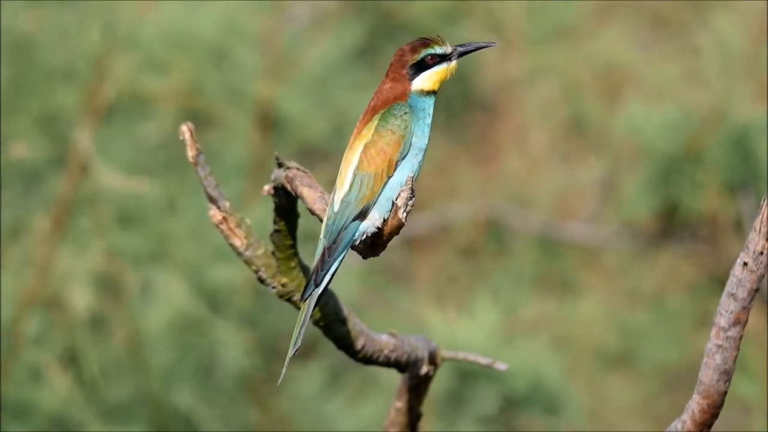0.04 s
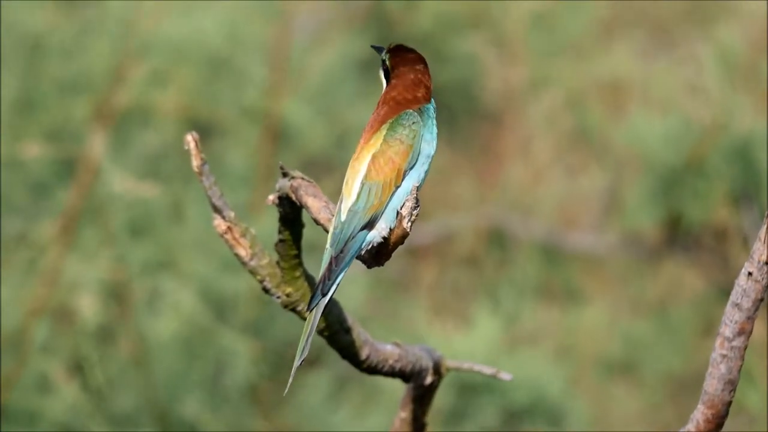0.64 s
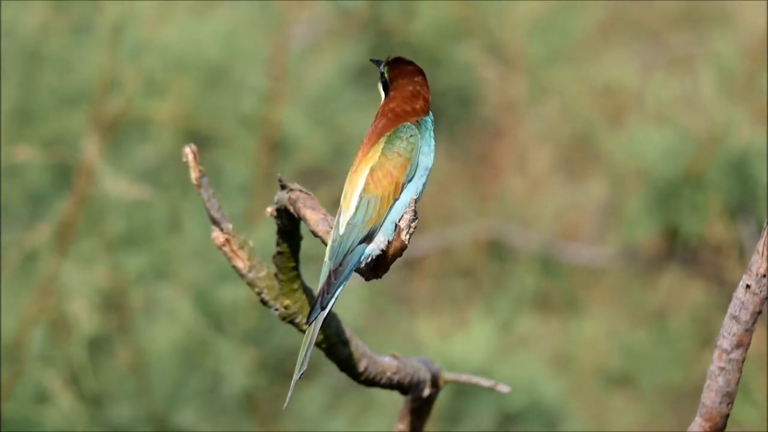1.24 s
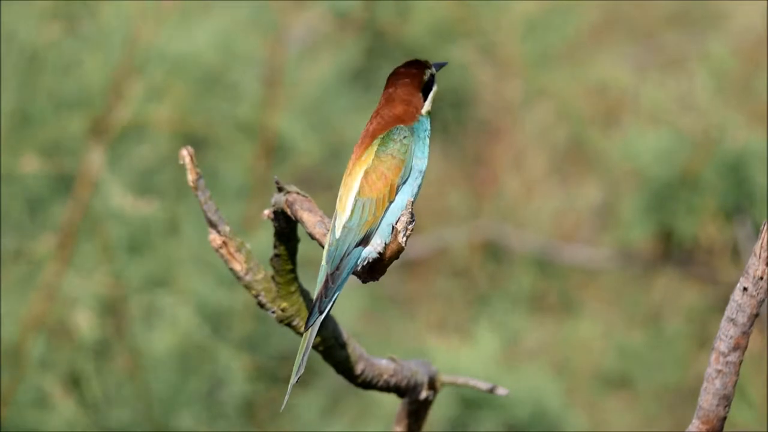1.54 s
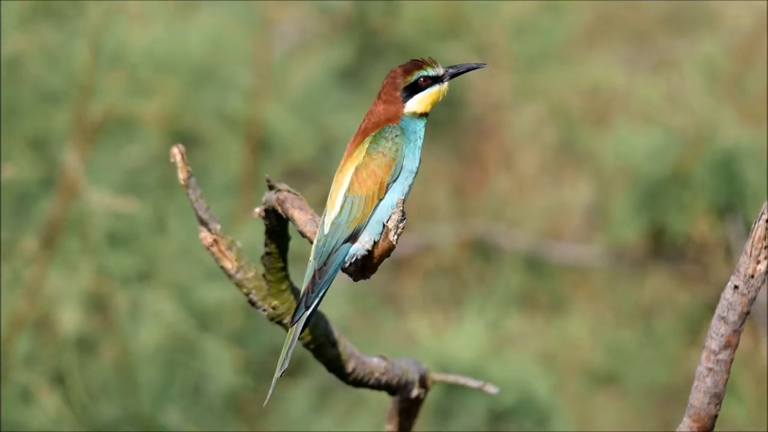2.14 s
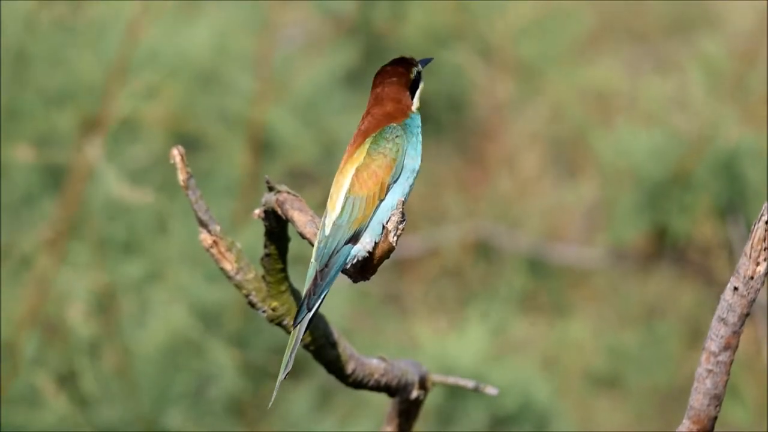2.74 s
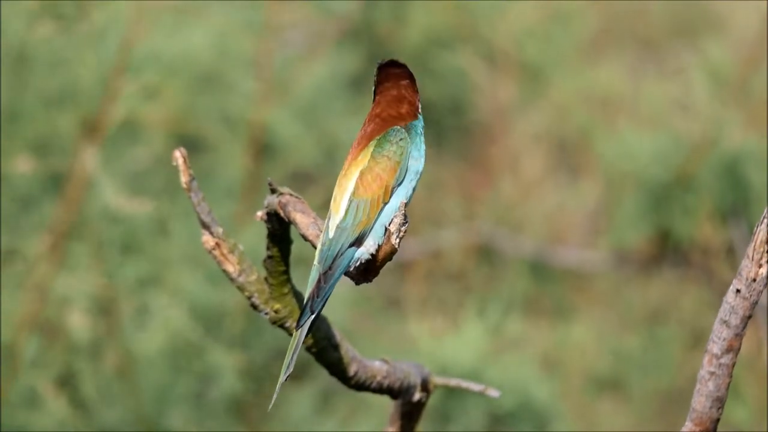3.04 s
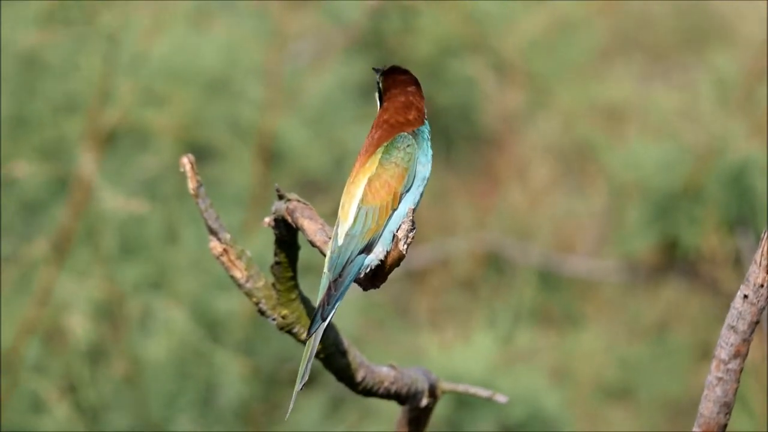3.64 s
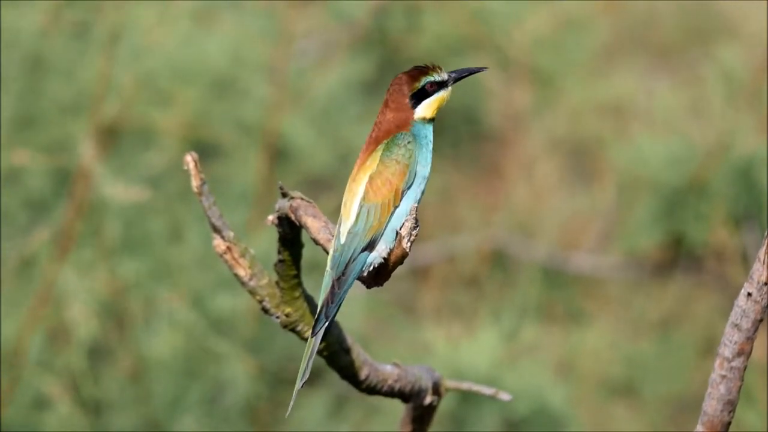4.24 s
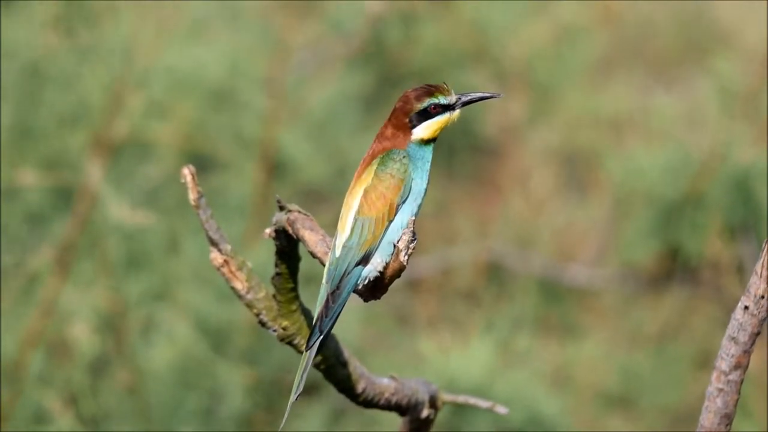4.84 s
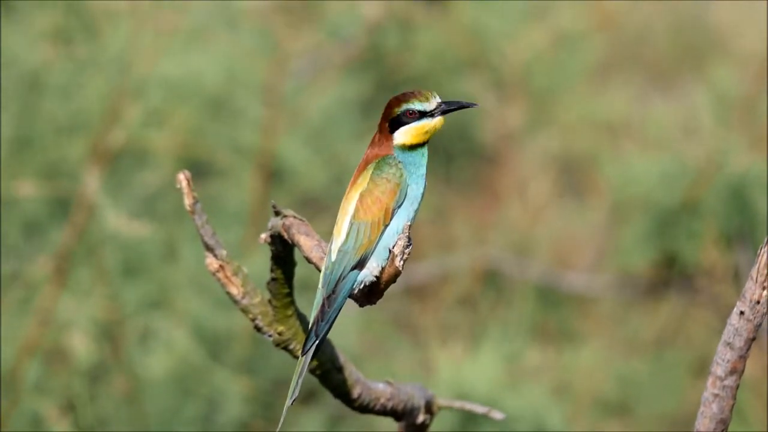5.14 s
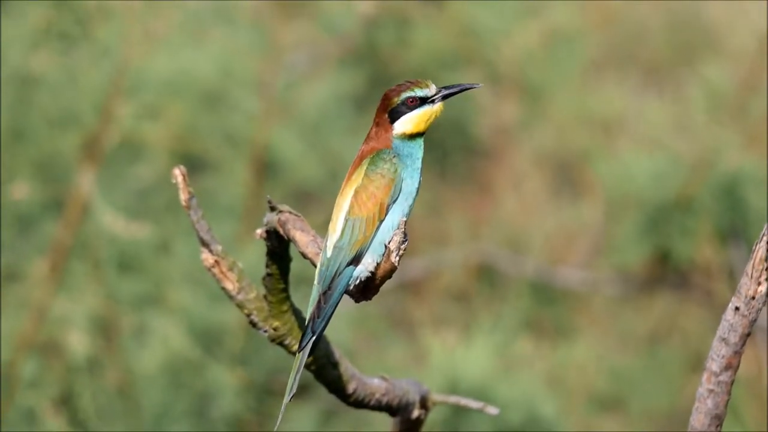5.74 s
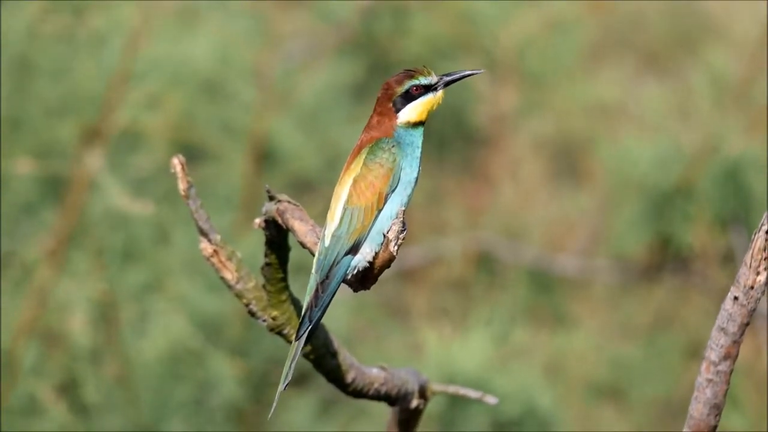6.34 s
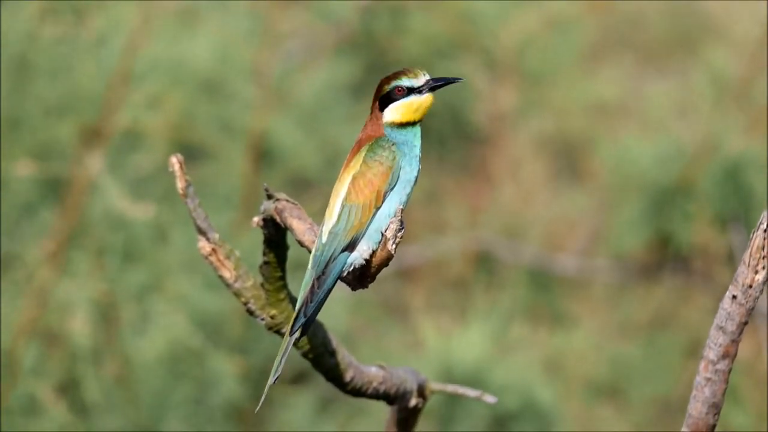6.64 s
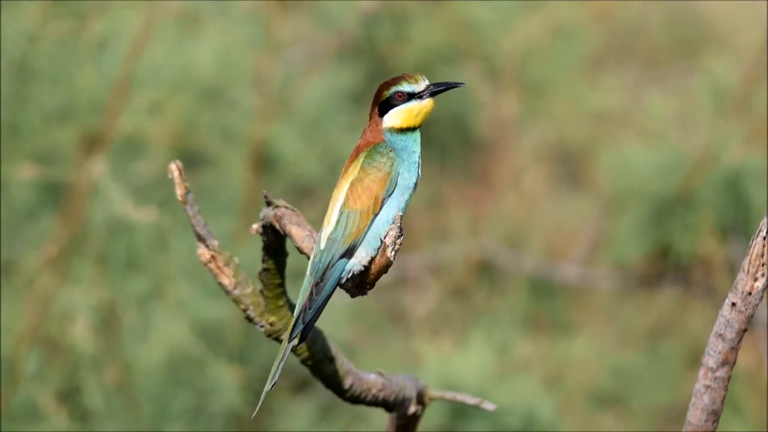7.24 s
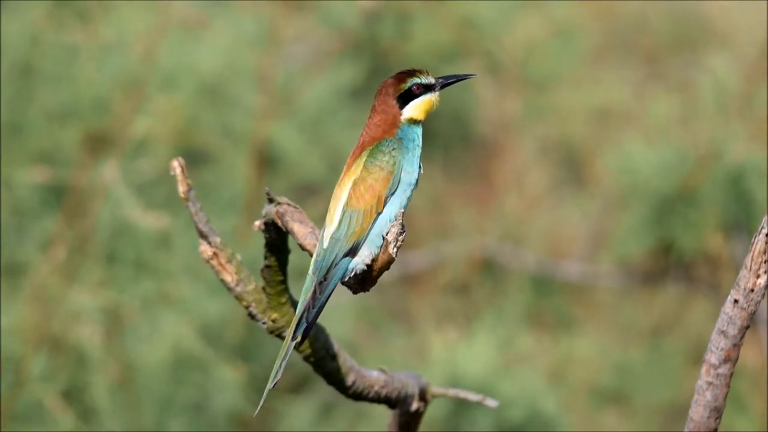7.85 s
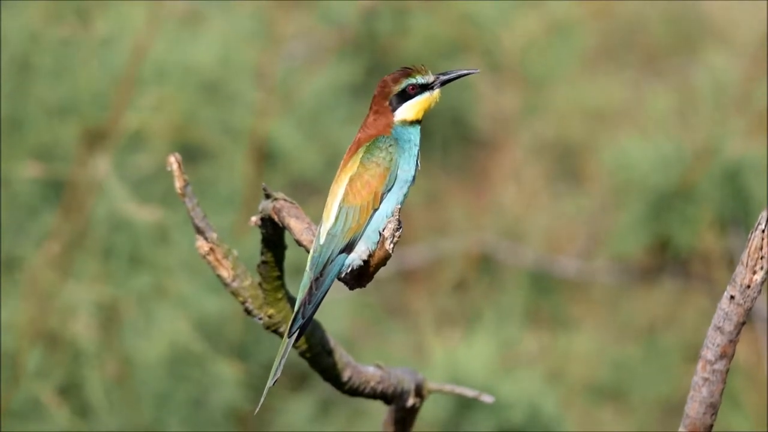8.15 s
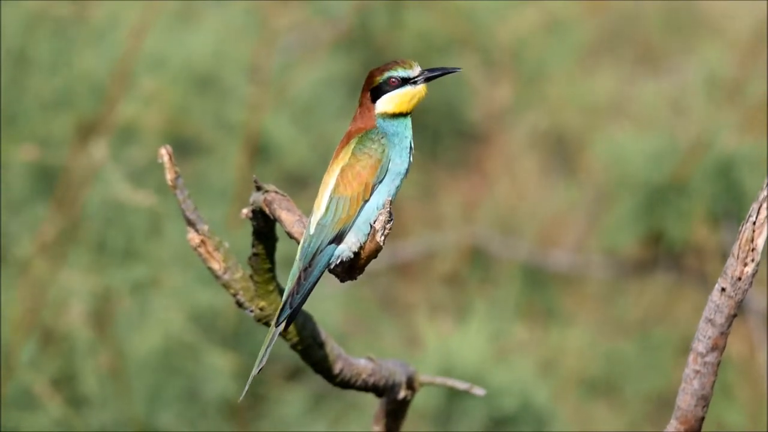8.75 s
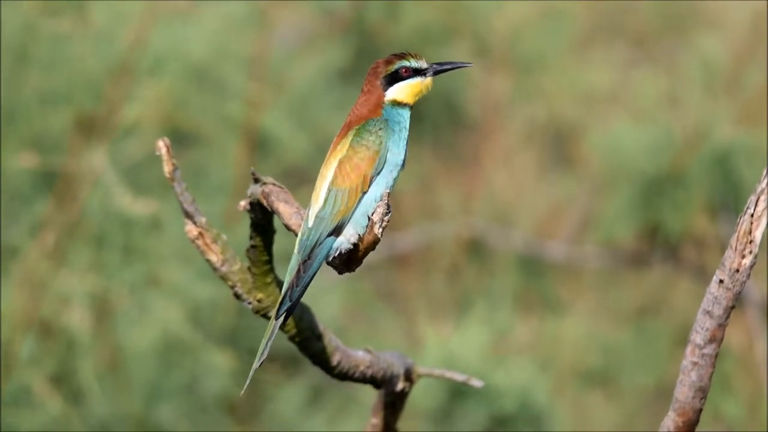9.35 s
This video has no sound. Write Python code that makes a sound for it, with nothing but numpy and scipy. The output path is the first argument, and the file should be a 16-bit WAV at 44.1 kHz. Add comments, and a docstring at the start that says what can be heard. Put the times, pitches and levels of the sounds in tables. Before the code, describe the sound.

A nearby bird repeats short, liquid whistles over gusts of wind rumbling on the microphone, with faint chirps from distant birds.

```python
"""Short, liquid, arched whistles: a bee-eater calls again and again in open country.
Each whistle is a nearly pure tone from its syrinx that climbs to a crest and drops.
Gusts rumble and thump as their eddies hit the two microphone ports. Small birds chirp far off,
blurred by the bushes, over a distant drone and a soft hiss of foliage."""
import sys
import numpy as np
from scipy import signal
from scipy.fft import rfft, irfft
from scipy.io import wavfile

SR = 44100
rng = np.random.default_rng(int(sys.argv[2]) if len(sys.argv) > 2 else 0)


def bounce(signal):
    """Save signal as a 16-bit WAV file at the path given by the first command-line argument."""
    frames = np.transpose(np.atleast_2d(signal))
    limited = np.clip(frames, -1, 1)
    pcm = np.round(limited * 32767).astype(np.int16)
    wavfile.write(sys.argv[1], SR, pcm)


N = 423360
TIME = np.arange(N) / SR


def from_db(db):
    return 10 ** (np.asarray(db) / 20)


def in_time(rows):
    """Each column of an automation curve at every sample."""
    times, *columns = np.transpose(rows)
    return [np.interp(TIME, times, column) for column in columns]


def noise(spectrum):
    """Noise of the given colour, rms 1."""
    hz, level_db = np.transpose(spectrum)
    bins_hz = np.maximum(np.fft.rfftfreq(N, 1 / SR), 1)
    eq = from_db(np.interp(np.log(bins_hz), np.log(hz), level_db))
    coloured = irfft(rfft(rng.standard_normal(N)) * eq, N)
    return coloured / np.sqrt(np.mean(coloured ** 2))


def drift(rate, t=TIME):
    """Random wander through `rate` new values a second."""
    return np.interp((t - t[0]) * rate, np.arange(4096), rng.standard_normal(4096))


def panned(pan_db):
    """Left and right gains of constant total power; pan_db is left minus right."""
    gains = from_db([[pan_db / 2], [-pan_db / 2]])
    return gains / np.sqrt(np.mean(gains ** 2))


def add(out, start_s, sound):
    """Mix a sound in from the given time on."""
    i = max(round(start_s * SR), 0)
    out[..., i:i + sound.shape[-1]] += sound[..., :max(N - i, 0)]


# Colours of the four ambience beds: (frequency [Hz], relative level [dB])
DRONE_COLOUR = [(100, -7.5), (200, 1), (260, -2), (400, -4.5), (520, -2.5), (640, -6), (730, -2),
                (800, 2.5), (870, -8.5), (960, -2), (1100, -17.5), (1600, -51.5)]
RUSH_COLOUR = [(700, -38), (1050, -0.5), (1230, 1.5), (1370, 0), (1530, 2), (1750, -5.5), (2200, -9.5),
               (3000, -13), (5000, -63)]
FOLIAGE_COLOUR = [(1700, -43), (2400, -2.5), (2900, 5), (3250, 1.5), (3650, 8), (3950, 4.5), (4350, 3.5),
                  (5000, -2.5), (5700, -4.5), (6600, -17), (7600, -14), (10000, -24), (15000, -60)]
AIR_COLOUR = [(30, -13), (150, -23), (400, 0), (1500, 1.5), (3000, -3.5), (5000, -8), (7500, -12.5),
              (10000, -16.5), (13000, -19), (16000, -28)]
# Fader rides on the far beds: (time [s], drone [dB], rush [dB], foliage [dB])
BED_FADERS = [(0, -55.5, -56, -62.5), (.64, -54, -53, -61.5), (2.4, -54.5, -50.7, -60.5),
              (3.87, -54, -52, -62), (5.3, -54.5, -51.5, -62.5), (6.7, -53.5, -53, -66.5),
              (7.62, -53, -51.5, -63.7), (8.2, -52.5, -50.5, -63.5), (9.6, -52.8, -50, -65)]


def countryside(drone_trim_db=4.5, rush_trim_db=1.0, air_db=-60, flicker_db=1.46):
    """Far drone, rush and foliage reach both ports alike; a faint, even hiss adds width."""
    drone_db, rush_db, foliage_db = in_time(BED_FADERS)
    drone = from_db(drone_db + drone_trim_db) * noise(DRONE_COLOUR)
    rush = from_db(rush_db + rush_trim_db + flicker_db * drift(12)) * noise(RUSH_COLOUR)
    foliage = from_db(foliage_db + flicker_db * drift(20)) * noise(FOLIAGE_COLOUR)
    air = from_db(air_db) * np.array([noise(AIR_COLOUR), noise(AIR_COLOUR)])
    return drone + rush + foliage + air


# Fader ride on the hum: (time [s], level [dB])
HUM_FADER = [(6.6, -69), (7.8, -53), (9.6, -53)]
# Colour of the hum: (frequency [Hz], relative level [dB])
HUM_COLOUR = [(550, -25), (760, 5.5), (980, 2.5), (1120, -22), (1300, -41)]


def far_hum():
    """A narrow, centred hum, perhaps of far traffic, swells towards the end."""
    return from_db(in_time(HUM_FADER)[0]) * noise(HUM_COLOUR)


# Colour of dry leaves: (frequency [Hz], relative level [dB])
LEAF_COLOUR = [(3000, -18), (6500, 3), (9500, 0), (11500, -14), (16000, -32)]


def rustle(peak_s=8.08, width_s=.2, level_db=-75.5):
    """Dry leaves stir in one brief, bright swell."""
    swell = np.exp(-((TIME - peak_s) / width_s) ** 2)
    return swell * from_db(level_db + 2 * drift(80)) * noise(LEAF_COLOUR)


def twitter(trim_db=-4.5, pip_hz=3680, count=520):
    """A far chorus of pips thins out over time; its level rides the foliage fader."""
    out = np.zeros(N)
    foliage_db = in_time(BED_FADERS)[2]
    for k, (chance, length, pitch, glide, size) in enumerate(rng.random((count, 5))):
        start = int((1 - np.sqrt(chance)) * (N - 1))
        t = TIME[:int((.012 + .03 * length) * SR)]
        progress = t / t[-1]
        spread = .5 if k % 3 else .04   # every third pip stays close to one note
        hz = pip_hz * np.exp(spread * (pitch - .5 + .5 * (glide - .5) * progress))
        swell = from_db(foliage_db[start] + trim_db + 3 * size) * np.sin(np.pi * progress)
        add(out, start / SR, swell * np.sin(2 * np.pi * np.cumsum(hz) / SR))
    return out


# Far chirps: (time [s], length [s], start pitch [Hz], middle pitch [Hz], end pitch [Hz], level [dB])
CHIRP_CUES = [(0.298, .06, 6200, 6450, 7000, -70), (2.11, .06, 5000, 4930, 4700, -69),
              (3.017, 0.091, 4400, 4080, 3830, -61), (3.347, 0.094, 4300, 4040, 4170, -61.5),
              (3.733, .04, 3900, 4400, 4514, -62), (4.662, 0.056, 5100, 4860, 4940, -62),
              (5.932, 0.051, 3500, 4400, 4990, -61), (5.946, 0.027, 3000, 3300, 3915, -58),
              (6.11, .032, 3400, 4050, 4290, -55.5), (6.189, 0.029, 4000, 4250, 4250, -68),
              (6.55, 0.042, 3400, 4000, 4700, -58), (6.731, 0.037, 3400, 4050, 4300, -55.5),
              (6.929, 0.054, 4500, 4400, 4220, -66.5), (7.146, 0.044, 4300, 4350, 4470, -63.5),
              (7.221, 0.022, 3400, 3770, 4470, -55), (7.385, 0.055, 4500, 4230, 3780, -63.5),
              (7.713, 0.064, 3600, 3830, 4080, -64), (8.155, 0.043, 4650, 5140, 5220, -58.5),
              (8.191, 0.041, 4900, 5600, 4700, -67), (8.222, 0.071, 4400, 3780, 3403, -64),
              (8.446, 0.061, 5000, 4950, 4852, -61), (8.502, 0.029, 3500, 3930, 4090, -58),
              (8.759, 0.059, 4400, 3650, 3500, -64), (9.105, 0.038, 4700, 5470, 5350, -65),
              (9.13, 0.039, 4700, 5380, 4630, -59), (9.182, 0.083, 4400, 3870, 3493, -63),
              (9.353, 0.058, 6000, 6460, 6000, -63), (9.358, 0.025, 3500, 4280, 4300, -57.5),
              (9.417, 0.029, 3200, 3700, 4434, -60)]


def small_birds(trim_db=2.5, rasp=0.75, waver=.055):
    """Thin glides through three pitches: quick ones fairly clean, drawn-out ones scratchy."""
    out = np.zeros(N)
    for s, length_s, start_hz, middle_hz, end_hz, chirp_db in CHIRP_CUES:
        t = TIME[:int(length_s * SR)]
        progress = t / length_s
        scratch = np.interp(length_s, [.03, .06], [.35, 1])
        glide = np.polyfit([0, .5, 1], [start_hz, middle_hz, end_hz], 2)
        hz = np.polyval(glide, progress) * (1 + waver * scratch * drift(500, t))
        swell = np.sqrt(np.sin(np.pi * progress)) * (1 + scratch * rasp * drift(350, t))
        add(out, s, from_db(chirp_db + trim_db) * swell * np.sin(2 * np.pi * np.cumsum(hz) / SR))
    return out


# Faint ticks: (time [s], level before the filter [dB], low edge [Hz], high edge [Hz], decay [s])
TICK_CUES = [(1.4235, -43, 2500, 13000, .0004), (4.469, -42, 2200, 4000, .006)]


def ticks():
    """Tiny dry snaps: band-passed noise bursts that die at once."""
    out, t = np.zeros(N), TIME[:SR // 40]
    for s, tick_db, low_hz, high_hz, decay_s in TICK_CUES:
        burst = from_db(tick_db) * rng.standard_normal(len(t)) * np.exp(-t / decay_s)
        band = signal.butter(2, [low_hz, high_hz], "band", fs=SR, output="sos")
        add(out, s, signal.sosfilt(band, burst))
    return out


# Light breeze between the gusts: (time [s], level [dB])
BREEZE_FADER = [(0, -54), (1.15, -55), (1.5, -47), (1.95, -53), (2.85, -47), (3.4, -48), (3.6, -54),
                (4.8, -59), (5.45, -53), (5.85, -59), (6.0, -53), (6.45, -70), (7.55, -64), (8.0, -49),
                (9.2, -53), (9.6, -47.5)]
# Gusts over the ports: (time [s], hold [s], level [dB], left minus right [dB])
GUST_CUES = [(.045, 0.022, -33, 3), (0.087, .05, -44, 0), (0.312, 0.048, -47, -3), (0.774, .06, -46, -6),
             (1.269, 0.044, -35, -3), (1.349, 0.053, -42, -5), (1.425, 0.034, -28, -2),
             (1.48, .11, -33, -4), (1.646, 0.045, -35, -2), (1.808, .015, -39, -12),
             (2.039, 0.086, -31, -2), (2.216, 0.062, -33, 2), (2.387, 0.047, -35, -5),
             (2.462, 0.16, -42, 2), (2.629, 0.052, -31.5, 3), (2.701, .05, -27, 1), (2.822, 0.059, -27, 0),
             (2.9, .12, -41, 0), (3.059, 0.016, -34, -14), (3.169, .14, -28, 0), (3.36, 0.12, -37, 1),
             (3.709, 0.068, -37.5, -8), (3.802, 0.076, -41, 5), (3.91, 0.072, -38, 4),
             (4.166, 0.021, -43, -12), (4.39, 0.043, -47, -7), (4.517, 0.034, -46, 3),
             (5.036, 0.081, -41, -1), (5.235, 0.051, -41, 2), (5.327, .18, -44, -9), (5.587, .14, -42, 2),
             (5.64, 0.031, -35, 14), (7.84, .1, -42, 5), (8.107, .04, -40.5, 0), (8.19, 0.051, -43.5, -4.5),
             (8.432, 0.036, -39, -4.5), (8.506, 0.028, -33.5, -0.5), (8.679, 0.031, -36.5, 4.5),
             (8.747, 0.018, -37.5, -12), (8.862, 0.089, -38, -4), (9.141, 0.043, -44, 0),
             (9.283, 0.033, -34.5, 0), (9.346, 0.033, -32, -2.5), (9.486, .11, -31.5, 0)]


def airflow(attack_s=.012, release_s=.014):
    """Wind strength at each port: gusts hit abruptly, hold and die away on top of the breeze."""
    breeze = from_db(in_time(BREEZE_FADER)[0])
    power = np.tile(breeze ** 2, (2, 1))
    t = TIME[:SR // 2]
    for s, hold_s, gust_db, pan_db in GUST_CUES:
        attack = np.minimum(t / attack_s, 1)
        release = np.exp(-np.maximum(t - attack_s - hold_s, 0) / release_s)
        add(power, s - attack_s, (from_db(gust_db) * panned(pan_db) * attack * release) ** 2)
    return np.sqrt(power)


# Rumble of eddies in a light breeze: (frequency [Hz], relative level [dB])
EDDY_COLOUR = [(20, -20), (60, 0), (120, 1), (180, -4.5), (270, -9.5), (420, -28), (800, -41), (2000, -72)]


def wind(trim_db=-0.5, light_breeze_db=-50, quickening=.19, lumps_db=3.5):
    """Each port meets its own eddies; stronger gusts sweep them past faster and pitch the rumble up."""
    ports = []
    for flow in airflow():
        strength = flow * from_db(lumps_db * drift(110))
        speed = (strength / from_db(light_breeze_db)) ** quickening
        rumble = np.interp(np.cumsum(speed) % N, np.arange(N), noise(EDDY_COLOUR))
        ports.append(strength * rumble)
    return from_db(trim_db) * np.array(ports)


# Strong eddies that thump a port: (time [s], peak [dB], pitch [Hz], left minus right [dB])
BUFFET_CUES = [(0.044, -25, 330, 16), (0.061, -25, 300, 18), (1.29, -19, 240, -17), (1.451, -9, 270, 18),
               (1.679, -19, 270, -18), (2.049, -19, 240, -1), (2.097, -16, 300, -18), (2.27, -18, 310, 11),
               (2.647, -14, 360, 18), (2.676, -6, 420, 18), (2.695, -22, 800, 10), (2.706, -14, 470, 18),
               (2.709, -17, 620, 4), (2.72, -19, 200, 0), (2.729, -12, 470, 8), (2.735, -13, 400, 6),
               (2.752, -18, 250, -11), (2.828, -11.5, 420, 18), (2.839, -21, 520, -3),
               (2.859, -16, 280, -4), (3.062, -25, 300, -14), (3.159, -11, 450, -18),
               (3.163, -17, 560, -12), (3.186, -14, 310, 18), (3.217, -16, 210, -5), (3.237, -18, 470, 6),
               (3.259, -17, 170, -5), (3.303, -5, 440, 18), (3.397, -22, 240, -7), (3.857, -27, 300, 6),
               (3.975, -28, 250, 14), (5.335, -24, 340, -14), (5.644, -17, 330, 18), (5.939, -30, 230, 14),
               (7.72, -28, 200, -15), (8.0, -29, 200, 3), (7.877, -22, 270, 18), (8.114, -27, 250, -6),
               (8.124, -27, 380, 5), (8.204, -12.5, 220, -18), (8.459, -26, 280, -10),
               (8.529, -20, 290, -18), (8.748, -22, 330, -18), (8.862, -25, 240, -12), (9.357, -22, 170, 0),
               (9.369, -17, 210, -6), (9.503, -12.5, 460, 15), (9.512, -22, 600, 5), (9.536, -21, 160, -3),
               (9.571, -20, 160, 3)]


def buffets(tightness=4.8):
    """A lone eddy gives one sharp push of pressure between two shallower pulls."""
    out = np.zeros((2, N))
    t = np.arange(-SR // 60, SR // 60) / SR
    for s, peak_db, hz, pan_db in BUFFET_CUES:
        pulse = (1 - 2j * np.pi * hz * t / tightness) ** -tightness   # about one cycle, no net flow
        sides = panned(pan_db) / panned(pan_db).max()
        # the port that is only grazed feels it out of step
        skew = np.where(sides < 1, 2, .5) * rng.standard_normal((2, 1))
        add(out, s + t[0], from_db(peak_db) * sides * np.real(pulse * np.exp(1j * skew)))
    return out


def scatter(dry, t60_s):
    """Bushes and ground throw back a thin, dying haze, different on each side."""
    t = TIME[:SR // 2]
    tail = rng.standard_normal((2, len(t))) * from_db(-60 * t / t60_s) * (t > .008)   # 8 ms pre-delay
    tail /= np.sqrt(np.sum(tail ** 2) / 2)
    return signal.fftconvolve(dry[None], tail, axes=1)[:, :N]


def syrinx_gate(u, opens_s=-.037, opening_s=.02, shut_s=.017, shutting_s=.009):
    """The syrinx opens gradually before the crest at u = 0 and shuts quickly after it."""
    return np.clip(np.minimum((u - opens_s) / opening_s, (shut_s - u) / shutting_s), 0, 1)


# Where a whistle lands, higher in the first excited run: (time [s], pitch [share of crest pitch])
LANDING_PITCH = [(1.4, 0.93), (3.0, 0.87), (3.3, 0.83), (9.5, 0.82)]


def arch(u, call_s, shoulder=.83, shoulder_s=-.016, climb_per_s=9.0, rise_s=.00533, fall_s=.0067):
    """Pitch as a share of the crest: a climb to a shoulder, a brief hump at u = 0, then the landing."""
    climb = shoulder + climb_per_s * np.minimum(u - shoulder_s, 0)
    landing = np.interp(call_s, *np.transpose(LANDING_PITCH))
    foot = np.where(u < 0, climb, landing)
    hump = np.exp(-(u / np.where(u < 0, rise_s, fall_s)) ** 2)
    return foot + (1 - foot) * hump


# Bee-eater whistles: (crest time [s], crest pitch [Hz], time stretch [ratio], crest level [dB],
# rise level [dB re crest], fall level [dB re crest], voice crack [0-1])
WHISTLE_CUES = [(1.385, 2390, 0.7, -42.5, -3, -10, 0), (1.5, 2390, 0.76, -44.5, -1, -8, 0),
                (1.648, 2300, 0.93, -37.5, -4.5, -4, 0), (1.811, 2291, 0.67, -34, -4, -4, 0),
                (2.118, 2350, 0.89, -38.5, -2.5, -1, 0.2), (2.265, 2385, 0.86, -38.5, -0.5, 1, 0.3),
                (2.462, 2363, 0.8, -40.5, 2, -1, 0.2), (2.65, 2337, 0.8, -40.5, 1.5, 6, 0.1),
                (2.852, 2434, 0.86, -38.5, 4.5, 4, 0.66), (2.98, 2390, 1.06, -35, -1.5, 1, 0.7),
                (3.118, 2276, 0.97, -33.5, -6, -2, 1), (3.344, 2200, 0.84, -33, -4.5, -1, 0.37),
                (3.6, 2246, 1.02, -30, -7, -5.5, 0.1), (3.783, 2337, 0.95, -30, -3, -4, 0.3),
                (3.917, 2386, 0.9, -32, -0.5, -2.5, 1), (4.084, 2340, 0.91, -38.5, 3, 3.5, 1),
                (4.313, 2248, 1.07, -41, 3.5, 3, 0.88), (4.616, 2253, 1.04, -46.5, 8, 7.5, 0.41),
                (4.878, 2310, 0.99, -46.5, 1.5, -7, 0.25), (5.074, 2330, 1.21, -40.3, -7.5, -13, 0.14),
                (5.309, 2213, 1.05, -39.5, -4, 0.5, 0.06), (5.566, 2264, 0.93, -36, -0.5, -1.5, 0.5),
                (5.763, 2253, 0.99, -37.5, 0, -2.5, 0.63), (5.996, 2287, 1, -40.5, 0.5, 1, 0.8),
                (6.171, 2330, 1, -39.5, 3, 1, 0.77), (6.474, 2242, 0.86, -39, -3, -4.5, 0.43),
                (6.69, 2237, 1, -42.5, -1, -2, 0.98), (7.0, 2315, 0.87, -39.5, -3, -7.5, 0.46),
                (7.261, 2202, 1.1, -38.5, -3, 0, 0.03), (7.529, 2291, 0.97, -34, -4, 1.5, 0.47),
                (7.847, 2202, 1.01, -35, -6, -2, 0.02), (8.084, 2307, 1.1, -38.5, -3.5, -12.5, 0.85),
                (8.298, 2273, 1.03, -40, 0.5, -1, 0.99), (8.623, 2160, 0.78, -40.5, 0.5, 6, 0.9),
                (8.897, 2272, 0.96, -41.5, 4, 0, 0.75), (9.155, 2180, 0.97, -34, -9, -6, 0.69),
                (9.41, 2209, 1.06, -30.5, -17, -10, 0.86)]


def bee_eater(trim_db=0.5, waver=0.0096, flutter_db=1.9, overshoot=0.038, octave_db=-38,
              ground_db=-16, ground_s=0.014):
    """A nearly pure whistle steps up to its crest and drops; the ground echo beats against the glide."""
    out = np.zeros(N)
    t = np.arange(-SR // 16, SR // 24) / SR
    for s, crest_hz, stretch, crest_db, rise_db, fall_db, crack in WHISTLE_CUES:
        u = t / stretch   # time from the crest, in seconds of an unstretched call
        # on the way up the voice can overshoot, break off for an instant and resume lower
        push = crack * np.interp(u, [-.024, -.016, -.0145], [0, 1, 0])
        dropout = crack * np.exp(-((u + .0145) / .002) ** 2)
        hz = crest_hz * (arch(u, s) + overshoot * push) * (1 + waver * drift(500, t))
        phase = 2 * np.pi * np.cumsum(hz) / SR
        effort_db = crest_db + np.interp(u, [-.009, -.003, .003, .008], [rise_db, 0, 0, fall_db])
        gain = from_db(trim_db + effort_db + flutter_db * drift(381, t))
        tone = np.sin(phase) + from_db(octave_db) * np.sin(2 * phase)
        call = gain * syrinx_gate(u) * (1 - dropout) * tone
        echo = np.interp(t - ground_s * rng.uniform(.6, 1.4), t, call)
        add(out, s + t[0], call + from_db(ground_db) * echo)
    return out


def scene():
    """The near bird sits almost dry, just right of centre; the far ones are blurred by the bushes."""
    near = bee_eater()
    far = small_birds() + twitter()
    near = near * panned(pan_db=-1.7) + from_db(-26) * scatter(near, t60_s=.46)
    far = far + from_db(-7) * scatter(far, t60_s=.35)
    return near + far + wind() + buffets() + ticks() + rustle() + countryside() + far_hum()


def record(dry, low_cut_hz=68, high_cut_hz=15720):
    """A low cut tames the wind; the top is cut steeply."""
    low_cut = signal.butter(2, low_cut_hz, "high", fs=SR, output="sos")
    high_cut = signal.ellip(10, .05, 50, high_cut_hz, fs=SR, output="sos")
    return signal.sosfiltfilt(high_cut, signal.sosfilt(low_cut, dry))


dry = scene()
out = record(dry)
bounce(out)
```